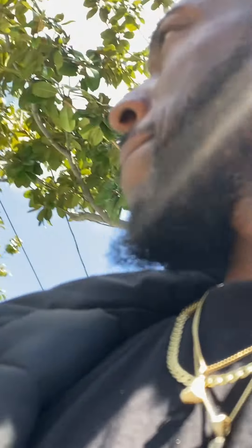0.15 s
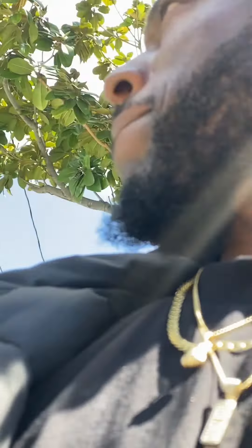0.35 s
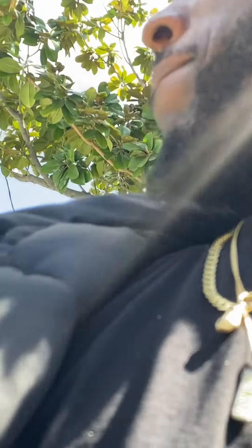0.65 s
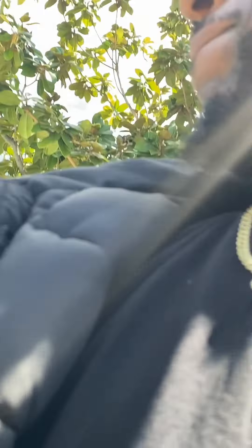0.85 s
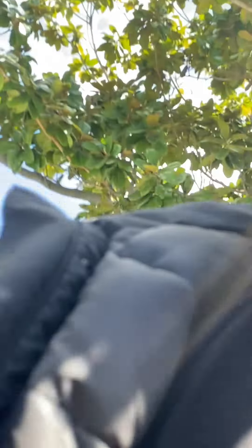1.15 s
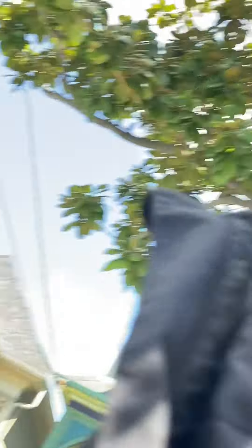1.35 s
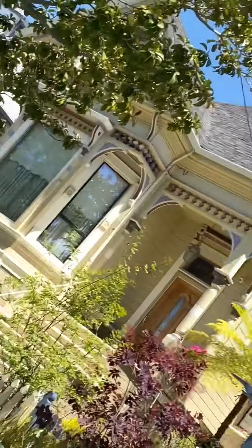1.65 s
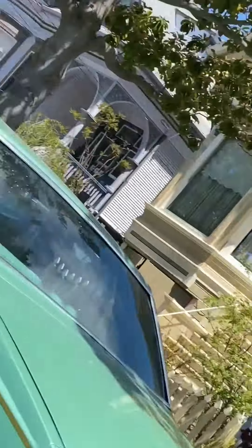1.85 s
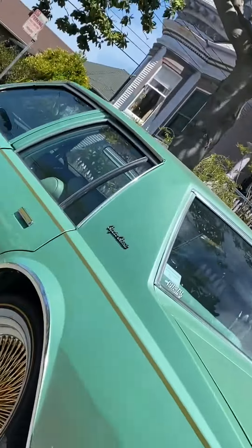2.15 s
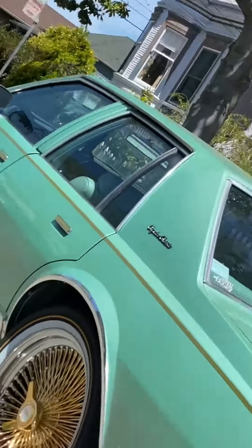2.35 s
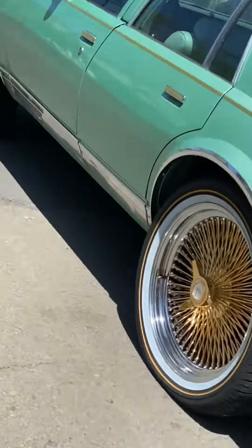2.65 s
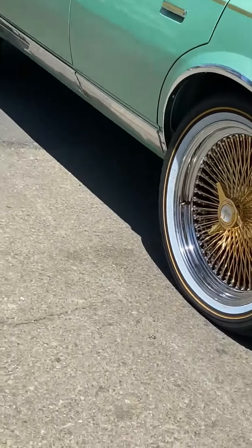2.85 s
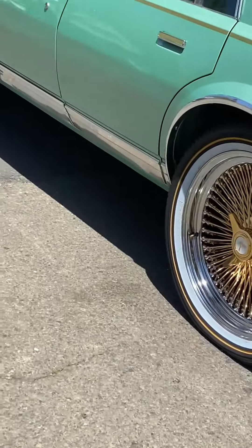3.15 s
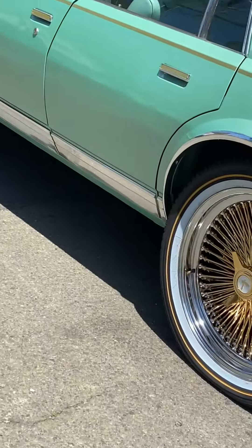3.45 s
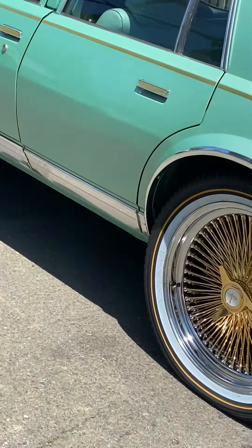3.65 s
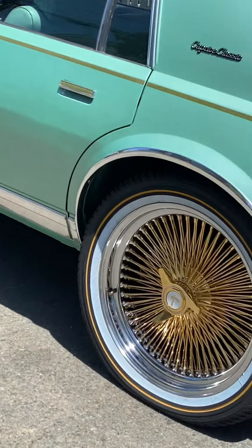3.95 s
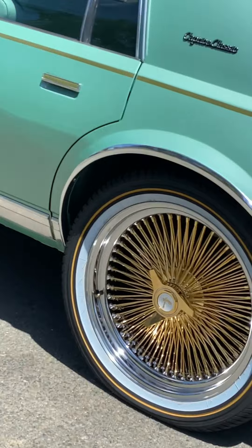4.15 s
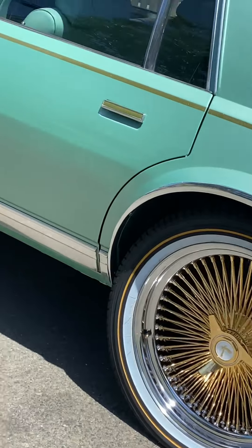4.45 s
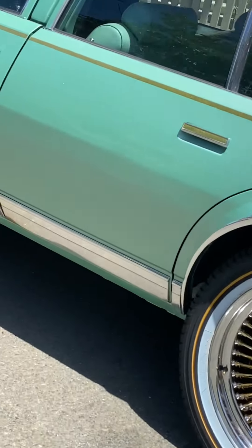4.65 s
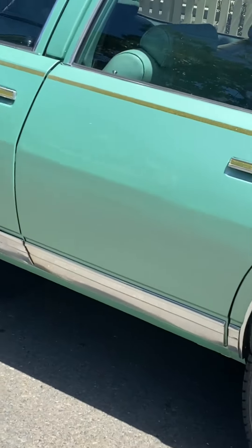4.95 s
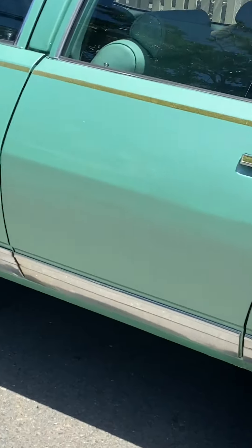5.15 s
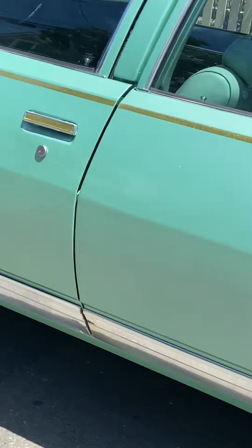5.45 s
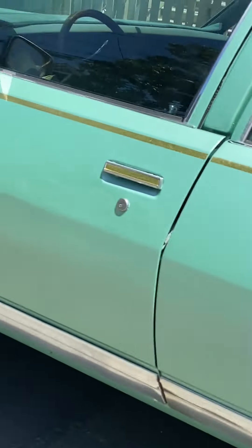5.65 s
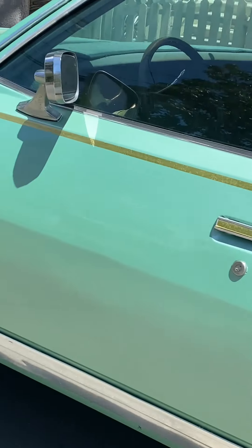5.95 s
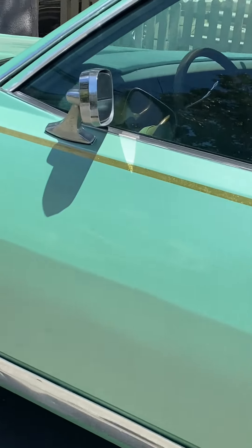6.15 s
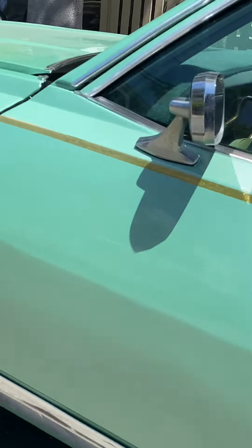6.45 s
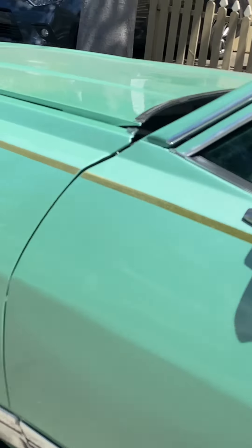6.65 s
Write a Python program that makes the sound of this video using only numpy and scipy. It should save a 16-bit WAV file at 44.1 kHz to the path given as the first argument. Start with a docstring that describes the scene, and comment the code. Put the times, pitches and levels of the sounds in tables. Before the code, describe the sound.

A steady, lumpy idle of a big engine at the kerb, its low drone continuous throughout. At first the exhaust is near and the hiss muffled; a strong soft knock on the camera case lands early, followed by a cluster of light taps, rubbing and fine jacket rustle. Afterward only the idle, slight scuffs on concrete and low puffs against the microphone remain, while the rushing air of the engine bay slowly grows clearer. Close handheld stereo, open air.

```python
"""V8 idling at the kerb

A hand-held camera swings round and walks from the tail of a big V8 to its bonnet, its two ports a little unlike.
Uneven exhaust pulses ring the muffler and pipes and throb about eight times a second, with gas rushing out.
Shaped noise makes the engine fan, which grows nearer, the faint open air and a few shoe scuffs on concrete.
A jacket rustles as fine crackle, fingers knock and rub on the camera, and soft puffs of air reach the microphone."""
import sys
import numpy as np
from scipy import signal
from scipy.fft import rfft, irfft, next_fast_len
from scipy.io import wavfile

SR = 44100
rng = np.random.default_rng(int(sys.argv[2]) if len(sys.argv) > 2 else 0)


def wav_record(signal):
    """Record a signal, one row per channel, as 16-bit PCM in the file named by sys.argv[1]."""
    frames = np.transpose(np.atleast_2d(signal))
    bounded = np.clip(frames, -1, 1)
    # unit amplitude maps onto the largest positive 16-bit level
    quanta = np.round(bounded * 32767).astype(np.int16)
    wavfile.write(sys.argv[1], SR, quanta)


N = 299086
TIME = np.arange(N) / SR  # seconds
IDLE_RPM = 948.0  # crank speed between surges and sags


def gain_of(db):
    """Decibels to amplitude."""
    return 10 ** (np.asarray(db) / 20)


def evened(x):
    """Scales to rms 1."""
    return x / np.sqrt(np.mean(x ** 2) + 1e-20)


def read(points, hz):
    """Reads a spectrum on a log-frequency axis."""
    f, value = np.transpose(points)
    return np.interp(np.log(hz + 1), np.log(f + 1), value)


def curves(rows, t=TIME):
    """Each column of a table of curves at the times t."""
    s, *columns = np.transpose(rows)
    return [np.interp(t, s, column) for column in columns]


def bump(offset, length):
    """A smooth swell of height 1; length is its full width where it has fallen to 1/e."""
    return np.exp(-(2 * offset / length) ** 2)


def filtered(x, response):
    """Applies a response given as a function of frequency."""
    size = next_fast_len(x.shape[-1] + 2048, real=True)
    hz = np.fft.rfftfreq(size, 1 / SR) + 1e-3  # keeps clear of division by zero
    return irfft(rfft(x, size) * response(hz), size)[..., :x.shape[-1]]


def resonance(f, hz, width):
    """A steep resonance of gain 1: two like stages in a row, each of the given width."""
    return 1 / (1 + 1j * (f / hz - hz / f) * hz / width) ** 2


def analytic(x):
    """The complex form of a tone: its size is the envelope, its square the octave."""
    return signal.hilbert(x, next_fast_len(N))[:N]


def drift(rate_hz):
    """Random wavering of rms 1, slower than about rate_hz."""
    return evened(filtered(rng.standard_normal(N), lambda f: 1 / (1 + (f / rate_hz) ** 4)))


def port_noise(colour):
    """Coloured noise of rms 1, partly alike at the two microphone ports."""
    # Likeness of the two ports. Each row: frequency in Hz, correlation 0-1.
    likeness = [(250, 0.95), (600, 0.69), (1100, 0.4), (1700, 1), (4500, 0.93), (8000, 0.8), (11000, 0.74),
                (13000, 1)]

    def noise_part(sign):
        def response(f):
            share = np.sqrt((1 + sign * np.clip(read(likeness, f), 0, 1)) / 2)
            return gain_of(read(colour, f)) * share
        return filtered(rng.standard_normal(N), response)

    shared, apart = noise_part(1), noise_part(-1)
    return evened(np.array([shared + apart, shared - apart]))


def bursts(rows, relative_width):
    """Brief swells of noise, each round its own pitch."""
    out = np.zeros(N)
    for s, length, db, hz in rows:
        noise = evened(filtered(rng.standard_normal(N), lambda f: resonance(f, hz, relative_width * hz)))
        out += gain_of(db) * noise * bump(TIME - s, length)
    return out


def distances():
    """Metres from the camera to the tailpipe and to the engine along the walk."""
    # Path from tail to bonnet. Each row: time in seconds, distance from the tailpipe in metres.
    walk = [(0, 0.69), (1.1, 0.92), (2, 1.4), (3.2, 1.47), (4.3, 2.12), (5.3, 2.85), (5.75, 2.85),
            (6.3, 3.14), (6.78, 3.04)]
    engine_m = 5.027  # from the tailpipe
    to_tail = np.maximum(curves(walk)[0], .1)
    return to_tail, np.maximum(engine_m - to_tail, .1)


def heard_db(reach, metres):
    """Direct sound falls with distance over an all-round share; screening acts on both.

    Reach: direct dB at 1 m, all-round dB, change when screened in dB, how early it clears (1 = evenly)."""
    # The camera starts turned away, screened from the car, then swings round.
    # Each row: time in seconds, screening 0-1.
    screening = [(0, 1), (.6, 0.94), (1.1, 0.68), (1.4, 0.58), (1.7, 0.19), (2.1, 0.01)]
    direct_db, around_db, screened_db, clears = reach
    screened = np.clip(curves(screening)[0], 0, None) ** clears
    open_gain = np.hypot(gain_of(direct_db) / metres, gain_of(around_db))
    return 20 * np.log10(open_gain) + screened_db * screened


def reflected(x, metres, height_m, road_db, kerb_db):
    """Road and kerb reflections comb the sound, and the comb slides as the listener walks."""
    camera_height_m, sound_m_per_s = 1.4, 343
    kerb_ms, kerb_ms_per_m = 3.8, .9  # delay at the source, and its growth with distance
    bounced_m = np.hypot(metres, camera_height_m + height_m)
    direct_m = np.hypot(metres, camera_height_m - height_m)
    road_s = (bounced_m - direct_m) / sound_m_per_s
    kerb_s = (kerb_ms + kerb_ms_per_m * metres) / 1000

    def delayed(s):
        return np.array([np.interp(TIME - s, TIME, side) for side in x])

    return evened(x + gain_of(road_db) * delayed(road_s) + gain_of(kerb_db) * delayed(kerb_s))


def rpm(t):
    """Crank speed: the idle hunts, with a smooth bump for each surge or sag."""
    # Surges and sags. Each row: centre in seconds, length in seconds, extra rpm.
    surges = [(.145, .26, 17), (.643, .61, 18.7), (2.016, .46, 31), (2.554, .2, -14.5), (2.945, .31, 17.6),
              (3.66, .32, -16.3), (4.0, 1.02, 15.7), (4.613, .26, -12.7), (5.145, .62, 17.7),
              (5.75, .06, -12), (6.175, .42, 27)]
    return IDLE_RPM + sum(extra * bump(t - s, length) for s, length, extra in surges)


def street(level_db=-54.0):
    """The faint steady hiss of the open air: coloured noise."""
    # Spectrum of the open air. Each row: frequency in Hz, relative dB per Hz.
    street_colour = [(200, 1), (700, 5.5), (1800, -15), (4000, -23), (9000, -13.5), (12100, -17),
                     (12800, -38), (15500, -47.5)]
    return gain_of(level_db) * port_noise(street_colour)


def scuffs():
    """Shoes scuff the concrete: brief broad bursts of noise."""
    # Each row: centre in seconds, length in seconds, level in dB, pitch in Hz.
    scuff_rows = [(1.963, 0.004, -30, 960), (4.043, 0.03, -37, 1150), (4.046, 0.018, -36, 610),
                  (4.845, 0.04, -38.5, 620), (6.512, 0.027, -35, 500)]
    return bursts(scuff_rows, relative_width=0.63)


def puffs():
    """Air puffs on the microphone: short swells of low, narrow noise."""
    # Each row: centre in seconds, length in seconds, level in dB, pitch in Hz.
    puff_rows = [(2.53, 0.18, -40, 49.7), (4.44, 0.12, -32, 48.7), (5.61, 0.11, -20, 52)]
    return bursts(puff_rows, relative_width=0.11)


def jacket(grains_per_s=2500, width_hz=4800, top_hz=11800):
    """Padded nylon brushes past the camera: a fine, bright crackle of random grains that swells and dies."""
    # Each row: centre in seconds, length in seconds, level in dB, pitch in Hz.
    rustles = [(0.05, 0.548, -63, 7860), (1.551, 1.601, -60.5, 8200)]
    out = np.zeros((2, N))
    for s, length, db, hz in rustles:
        grains = rng.standard_normal((2, N)) * (rng.random((2, N)) < grains_per_s / SR)
        crackle = filtered(grains, lambda f: resonance(f, hz, width_hz) ** 2 / (1 + (f / top_hz) ** 20))
        out += gain_of(db) * evened(crackle) * bump(TIME - s, length)
    return out


def finger_knocks(rise_s=0.0038, softness=3.9, ring_s=0.0072, thud_db=-14, thud_hz=300):
    """Soft knocks ring the camera's case for a few cycles; each also gives a dull thud."""
    # Each row: start in seconds, level in dB, after-ring in dB against the knock, ring in Hz.
    knock_rows = [(1.011, -19.5, -20, 467), (1.505, -25.5, -15, 511), (1.6333, -10, -38, 493),
                  (1.822, -26, -11, 490), (1.899, -16.5, -22, 536), (1.965, -31, -4, 542),
                  (2.074, -29, -10, 556), (2.154, -30.5, -1.5, 490), (2.235, -26.5, -11, 526),
                  (2.419, -22, -6, 513), (2.44, -33, -15, 517), (2.464, -26.5, -1, 486),
                  (2.552, -28.5, -9, 468), (2.589, -28, -9, 466), (2.606, -33, -1, 588),
                  (2.902, -24.5, -23, 486)]
    out = np.zeros(N)
    for s, db, ring_db, hz in knock_rows:
        age = np.clip(TIME - s, 0, .2)
        swell = (age / rise_s * np.exp(1 - age / rise_s)) ** softness
        # a finger that lifts lets the case ring on
        tail = gain_of(ring_db) * age / ring_s * np.exp(1 - age / ring_s)
        case = (swell + tail) * np.sin(2 * np.pi * hz * age)
        thud = gain_of(thud_db) * swell * np.sin(2 * np.pi * thud_hz * age)
        out += gain_of(db) * (case + thud)
    return out


def finger_rub(case_hz=530, case_width_hz=240, slips_per_s=1400, level_db=-42):
    """One slide of the fingers over the case: random tiny slips of skin ring it."""
    start_s, rise_s, end_s, release_s = 1.4, 0.69, 2.5, 0.05
    slips = rng.standard_normal(N) * (rng.random(N) < slips_per_s / SR)
    rub = evened(filtered(slips, lambda f: resonance(f, case_hz, case_width_hz) ** 2))
    stroke = np.clip(np.minimum((TIME - start_s) / rise_s, (end_s - TIME) / release_s), 0, 1)
    return gain_of(level_db) * stroke * rub


def fan_unrest(flutter_db=0.59):
    """The air of the engine bay flutters at random and chuffs twice in each firing cycle."""
    # Each row: place in the cycle 0-1, length in cycles, swell in dB.
    chuffs = [(0.0, .11, 1.3), (.35, .2, 1)]
    cycles = np.cumsum(rpm(TIME)) / (2 * 60 * SR)  # two turns of the crank each
    chuff_db = 0
    for place, length, db in chuffs:
        offset = (cycles - place + .5) % 1 - .5
        chuff_db = chuff_db + db * bump(offset, length)
    return gain_of(flutter_db * drift(40) + chuff_db - chuff_db.mean())


def fan(split_hz=1800):
    """Air rushes through the engine bay: body, hiss, bay resonances and fizz, each with its own reach."""
    # Spectrum of the rushing air. Each row: frequency in Hz, relative dB per Hz.
    fan_colour = [(200, -7.5), (400, -5), (520, -1.5), (800, -4.5), (1150, -6.5), (1480, -7), (1830, -10),
                  (2200, -9), (2700, -9), (3100, -11.5), (3900, -14.5), (5200, -14.5), (7600, -19.5),
                  (9000, -26.5), (11600, -33), (15500, -49)]
    # Engine-bay resonances. Each row: frequency in Hz, width in Hz, relative dB.
    bay_modes = [(1410, 410, -0.5), (2160, 150, 1.5), (2620, 170, -0.5)]
    # How each carries: direct dB at 1 m, all-round dB, change when screened in dB, how early it clears.
    body_reach = (-32, -59, -6, 1.4)
    hiss_reach = (-34, -58.5, -9.5, 1)
    bay_db, bay_db_per_m = -39.5, -7.5  # at 1 m, and the fade: heard only near the bonnet
    # the finest hiss escapes only at the gaps of the bonnet and fades fast
    fizz_db, fizz_db_per_m, fizz_hz = -44, -14.5, 8500  # at 1 m, the fade, lower edge
    to_engine = distances()[1]
    air = reflected(port_noise(fan_colour), to_engine, height_m=.87, road_db=-25.0, kerb_db=-15.5)
    body = filtered(air, lambda f: 1 / (1 + (f / split_hz) ** 4))
    hiss = air - body
    fizz = filtered(air, lambda f: 1 / (1 + (fizz_hz / f) ** 8))

    def bay_response(f):
        return sum(gain_of(db) * abs(resonance(f, hz, width)) for hz, width, db in bay_modes)

    bay = filtered(port_noise(fan_colour), bay_response)
    rush = (evened(body) * gain_of(heard_db(body_reach, to_engine))
            + evened(hiss) * gain_of(heard_db(hiss_reach, to_engine))
            + evened(bay) * gain_of(bay_db + bay_db_per_m * (to_engine - 1))
            + evened(fizz) * gain_of(fizz_db + fizz_db_per_m * (to_engine - 1)))
    return fan_unrest() * rush


def firings(uneven_db=0.57, jitter_ms=0.12):
    """Eight exhaust pulses in two turns of the crank, no two burns alike."""
    # How each cylinder's pulse reaches the tailpipe, in firing order.
    # Each row: relative strength in dB, lateness in ms.
    cylinders = [(-5, 3), (-10.5, -2.5), (1.7, -1.49), (7.5, 2.05), (-7.5, -1.22), (-5.5, -2), (3, 2.5),
                 (2.4, -1.5)]
    # A weak burn now and then leaves a hole in the throb.
    # Each row: centre in seconds, length in seconds, change in dB.
    stumbles = [(0.276, 0.027, -5.5), (0.896, .03, -4), (2.537, .03, -4.5), (2.92, .03, -6.5),
                (3.42, 0.033, -6), (3.538, 0.035, -8), (3.796, 0.026, -4), (4.302, .03, -7),
                (4.421, 0.033, -7), (4.614, 0.033, -7.5), (5.556, 0.13, -3), (5.758, .12, -3)]
    surge_db_per_rpm = 0.06  # the burns are stronger while the crank picks up
    t = np.arange(-SR, N + SR) / SR  # starts a second early so the pipe already rings
    cycles = np.cumsum(rpm(t)) / (2 * 60 * SR)
    cycles -= cycles[SR]
    count = len(cylinders)
    number = np.arange(np.ceil(cycles[0] * count) + 2, cycles[-1] * count - 2).astype(int)
    strength_db, late_ms = np.array(cylinders)[number % count].T
    burn, lag = rng.standard_normal((len(number), 2)).T
    at = np.interp(number / count, cycles, t) + (late_ms + jitter_ms * lag) / 1000
    surge_db = surge_db_per_rpm * (rpm(at) - IDLE_RPM)
    stumble_db = sum(db * bump(at - s, length) for s, length, db in stumbles)
    pulses = np.zeros(len(t))
    pulses[np.round((at + 1) * SR).astype(int)] = gain_of(strength_db + uneven_db * burn + surge_db + stumble_db)
    return pulses


def ring(pulses, modes):
    """Pulses ring resonances of alternating sign; the early second is cut off."""
    def response(f):
        return sum((-1) ** k * gain_of(db) * resonance(f, hz, width)
                   for k, (hz, width, db) in enumerate(modes))

    return evened(filtered(pulses, response)[SR:SR + N])


def steepened(note, power):
    """Loud swells in a pipe steepen and come out louder still, so the note beats with the throb."""
    return evened(note * abs(analytic(note)) ** power)


def gas_rush(low_note, low_level_db, to_tail, level_db=-30, follow=0.2, throb=0.086):
    """Gas rushes from the tailpipe: coloured noise that swells with the low note."""
    # Spectrum of the rushing gas. Each row: frequency in Hz, relative dB per Hz.
    gas_colour = [(20, -27), (32, -16), (48, -1), (75, -2), (120, 0.5), (150, -5.5), (250, -5), (330, -10),
                  (430, -19.5), (600, -21.5), (900, -37.5), (2000, -68)]
    flow = evened(1 + throb * abs(analytic(low_note)))
    gas = reflected(port_noise(gas_colour), to_tail, height_m=0.38, road_db=-14, kerb_db=-24.5)
    return gas * flow * gain_of(level_db + follow * (low_level_db - low_level_db.mean()))


def exhaust(boom_steepen=0.082, high_steepen=0.47, high_flutter_db=1.38):
    """The muffler booms at both ends of the car, the pipes add higher notes, and gas rushes out."""
    # Muffler and pipe resonances; the top one is the front pipe, heard from the engine end.
    # Each row: frequency in Hz, width in Hz, relative dB.
    muffler_modes = [(60.35, 5.8, -15.5), (98.35, 17.22, 0.5), (100.9, 19.83, -4)]
    low_modes = [(203.05, 17.8, 0)]
    high_modes = [(288.5, 16.4, 3.5), (314, 12, -18)]
    top_modes = [(382, 31, 0)]
    # How each carries: direct dB at 1 m, all-round dB, change when screened in dB, how early it clears.
    boom_reach = (-15, -19.5, -0.1, 4.5)
    low_reach = (-24, -50.5, -19, 1.5)
    high_reach = (-43, -37.5, -5.5, 2)
    top_reach = (-40, -64.5, 6, 2)
    # The pipe notes waver along the walk. Each row: time in seconds, change in dB.
    low_waver = [(0, 4), (.4, -2.5), (1.2, 2.5), (2, -2), (2.4, -1), (2.8, 0), (3.6, 2.5), (4.1, -.5),
                 (4.6, 3.5), (5, -2), (5.7, 4.5), (6.1, -3.5), (6.78, -5)]
    high_waver = [(0, -3.5), (.7, 3), (1.3, -3), (1.7, 3), (2.5, -1.5), (2.8, 1.5), (3.9, 1.5), (4.4, -3),
                  (5.1, 2.5), (5.5, 0.5), (6, 1.5), (6.3, 1), (6.78, -17)]
    boom_front_db = -11.5  # boom that comes out under the engine, at 1 m
    octave_db = -5.5  # against the low note
    pulses = firings()
    to_tail, to_engine = distances()

    boom_gain = np.hypot(gain_of(heard_db(boom_reach, to_tail)), gain_of(boom_front_db) / to_engine)
    low_level_db = heard_db(low_reach, to_tail)
    low_gain = gain_of(low_level_db + curves(low_waver)[0])
    high_gain = gain_of(heard_db(high_reach, to_tail) + curves(high_waver)[0])
    top_gain = gain_of(heard_db(top_reach, to_engine))

    boom = steepened(ring(pulses, muffler_modes), boom_steepen)
    # the boom steepens in the pipe and gains a clean octave, which joins the low note
    octave = evened((analytic(boom) ** 2).real)
    low_note = evened(ring(pulses, low_modes) - gain_of(octave_db) * octave)
    flutter = gain_of(high_flutter_db * drift(16))
    high_note = steepened(ring(pulses, high_modes) * flutter, high_steepen)
    top_note = ring(pulses, top_modes)
    notes = boom_gain * boom - low_gain * low_note + high_gain * high_note - top_gain * top_note
    return notes + gas_rush(low_note, low_level_db, to_tail)


def scene():
    """Airborne sound differs in level and phase at the ports; knocks, rub and puffs reach both alike."""
    # Level between the ports. Each row: frequency in Hz, left over right in dB.
    tilt = [(60, -3), (110, 0), (190, -2), (350, -2.5), (620, -1), (1120, 6), (1900, 0), (3600, 0)]
    # Phase between the ports. Each row: frequency in Hz, radians that left leads.
    lead = [(500, 0), (950, 1.2), (1450, -.1), (2000, .45), (2600, 1.15), (3700, .4), (4400, 1.1),
            (4740, 2.1), (5000, 4.3), (5250, 6.2), (6000, 7), (10000, 8.35), (12500, 9.4)]
    sides = np.array([[.5], [-.5]])  # each port takes half of the difference
    airborne = street() + scuffs() + fan() + exhaust()

    def port_response(f):
        return gain_of(sides * read(tilt, f)) * np.exp(1j * sides * read(lead, f))

    at_ports = filtered(airborne, port_response)
    return at_ports + puffs() + jacket() + finger_knocks() + finger_rub()


def record(dry):
    """The recorder's band limit: a steep low-pass filter."""
    edge_hz = 15750
    low_pass = signal.firwin(511, edge_hz, window=("kaiser", 9), fs=SR)
    return signal.oaconvolve(dry, low_pass[None], "same")


dry = scene()
out = record(dry)
wav_record(out)
```